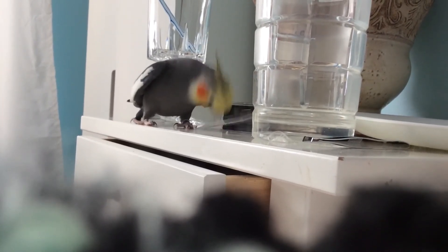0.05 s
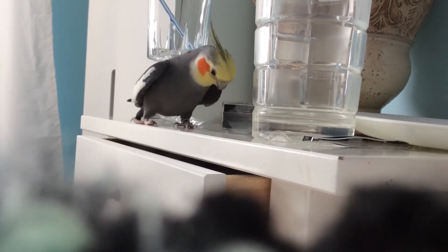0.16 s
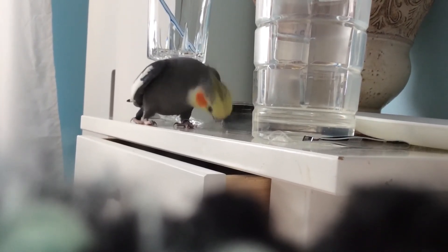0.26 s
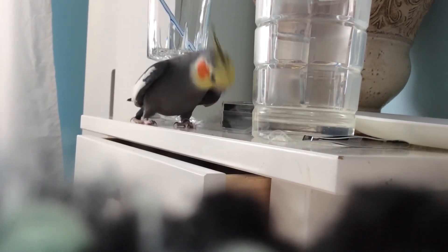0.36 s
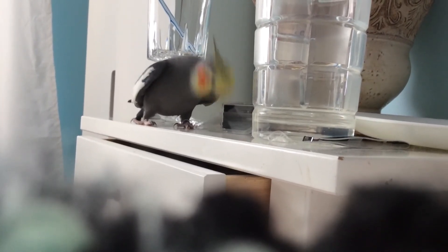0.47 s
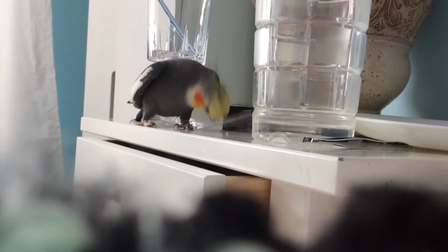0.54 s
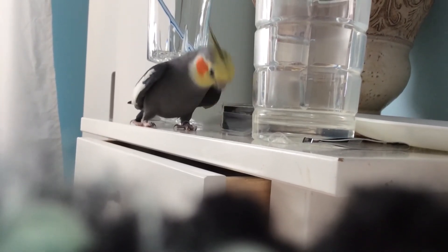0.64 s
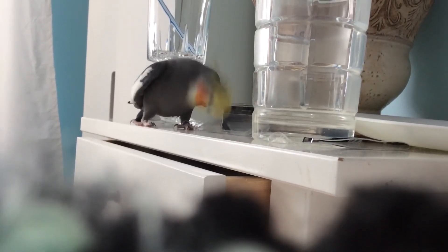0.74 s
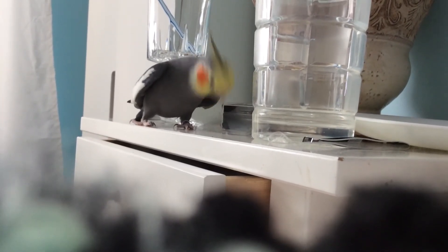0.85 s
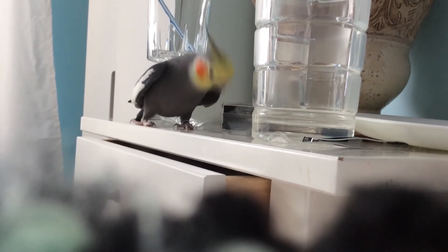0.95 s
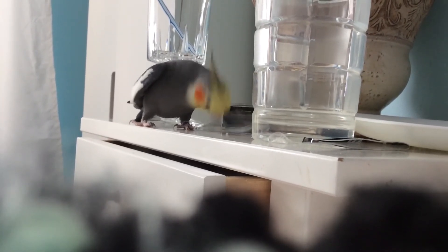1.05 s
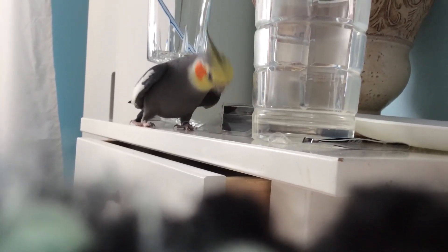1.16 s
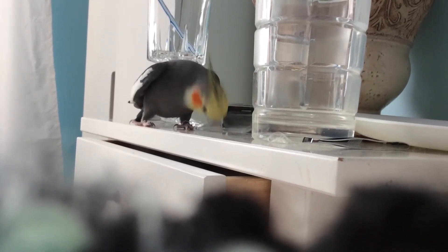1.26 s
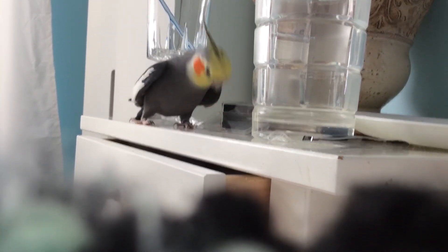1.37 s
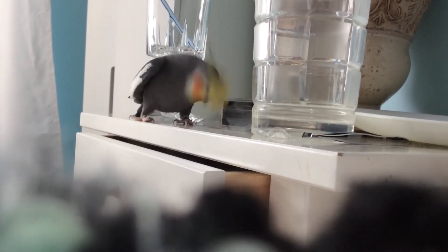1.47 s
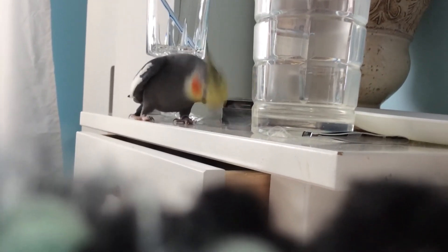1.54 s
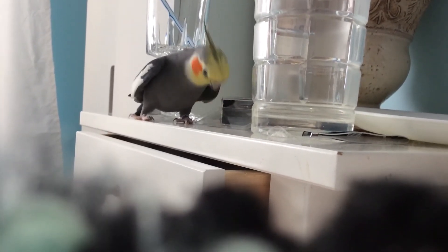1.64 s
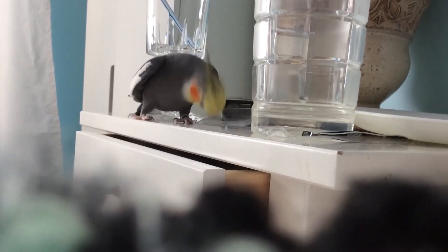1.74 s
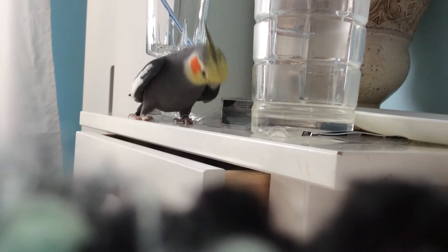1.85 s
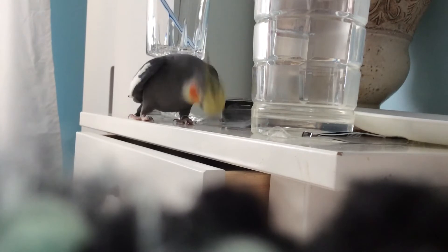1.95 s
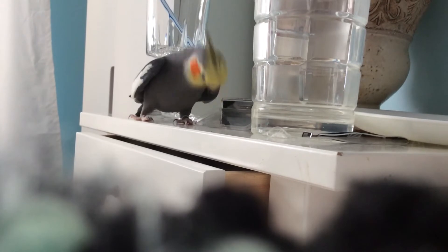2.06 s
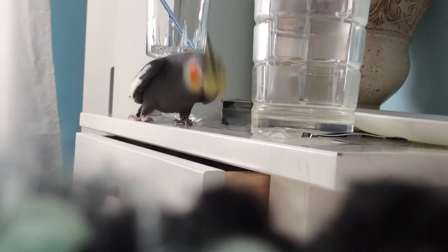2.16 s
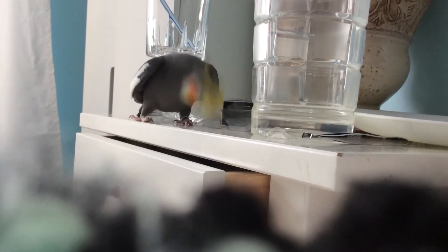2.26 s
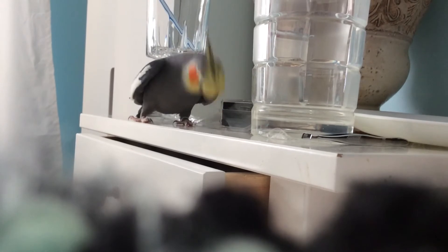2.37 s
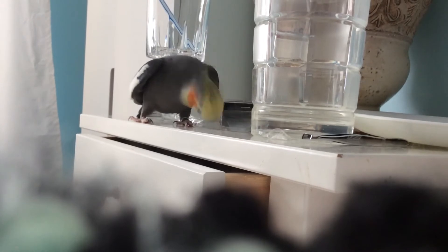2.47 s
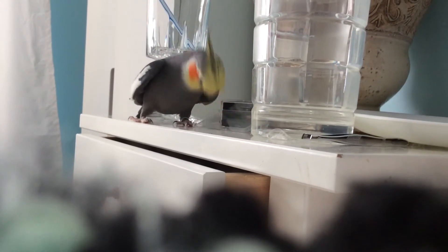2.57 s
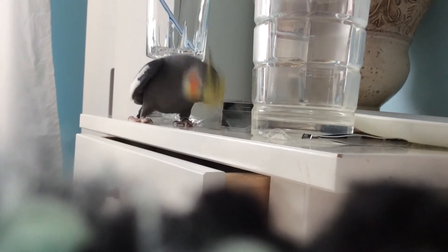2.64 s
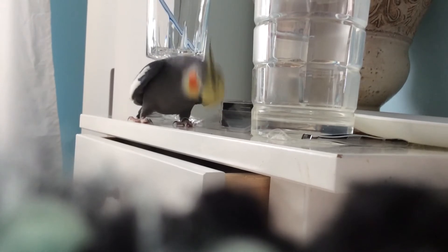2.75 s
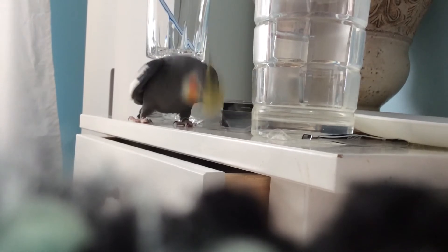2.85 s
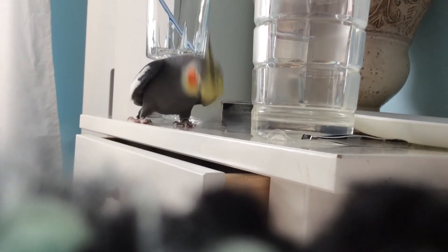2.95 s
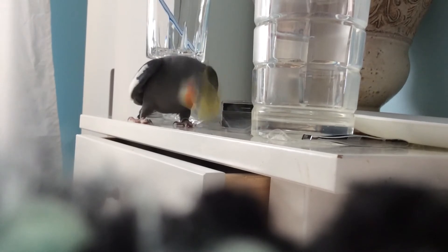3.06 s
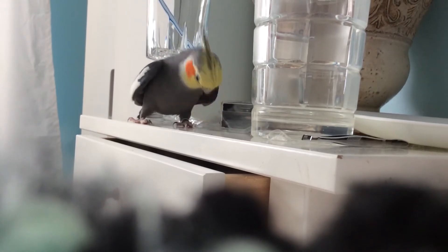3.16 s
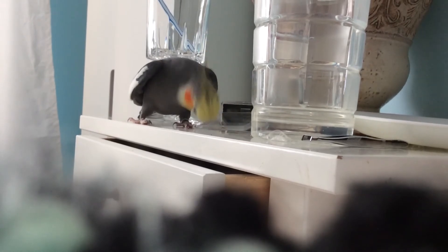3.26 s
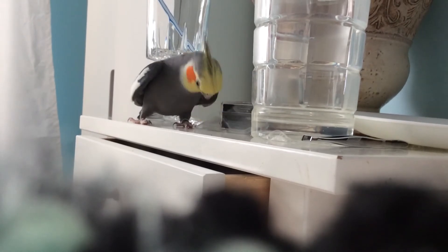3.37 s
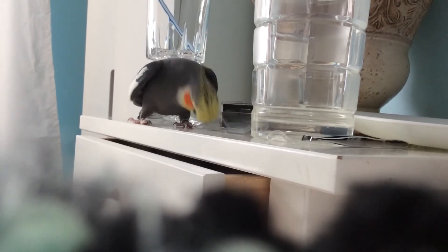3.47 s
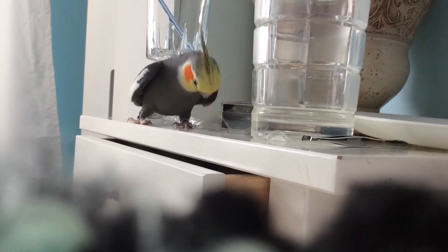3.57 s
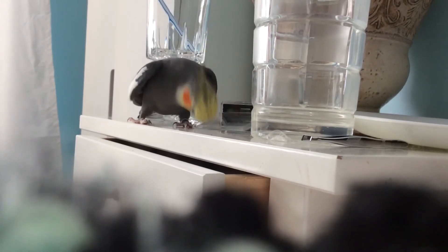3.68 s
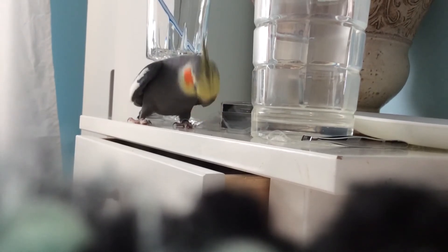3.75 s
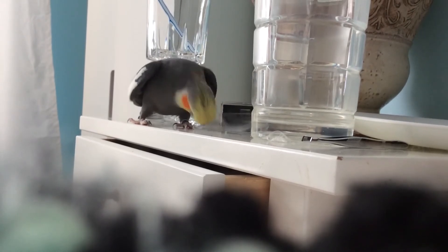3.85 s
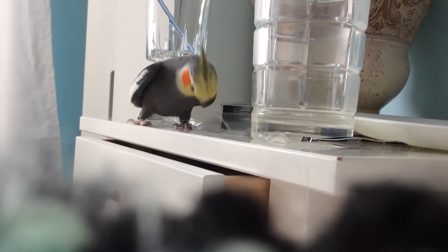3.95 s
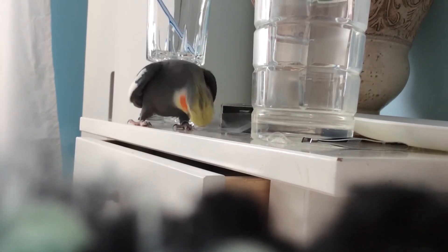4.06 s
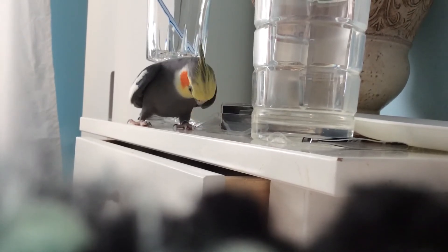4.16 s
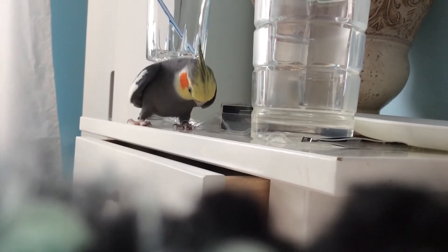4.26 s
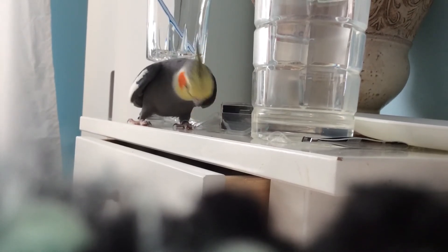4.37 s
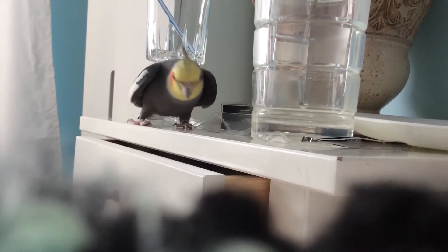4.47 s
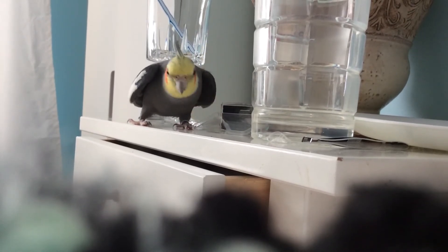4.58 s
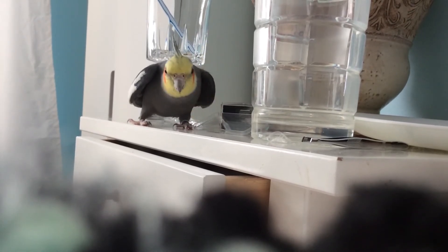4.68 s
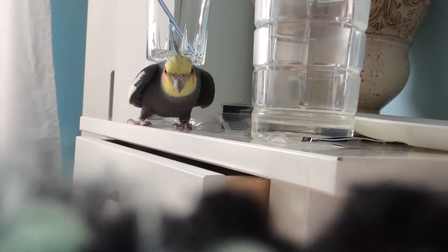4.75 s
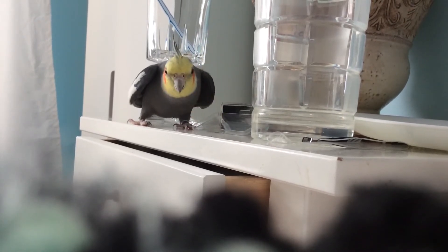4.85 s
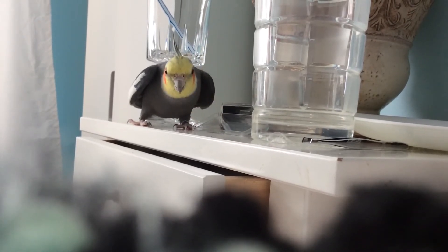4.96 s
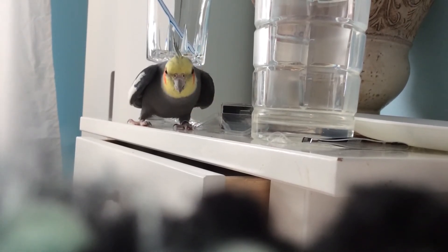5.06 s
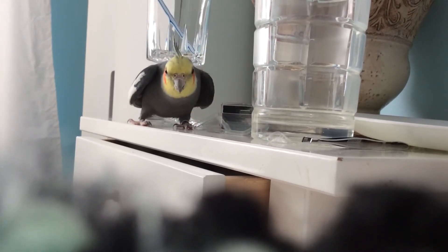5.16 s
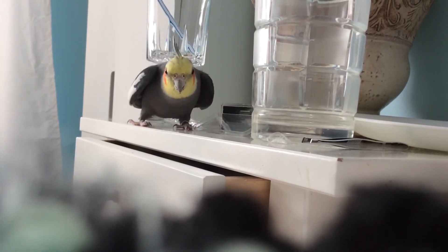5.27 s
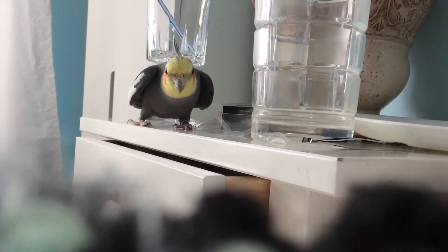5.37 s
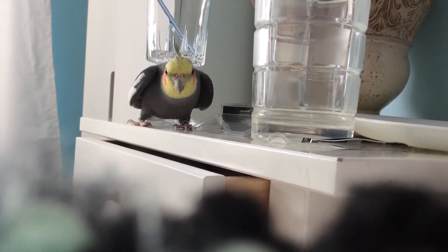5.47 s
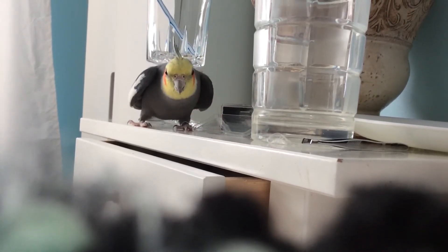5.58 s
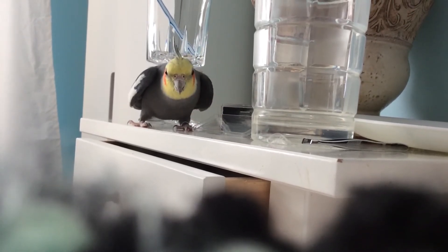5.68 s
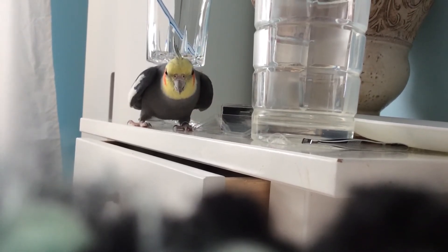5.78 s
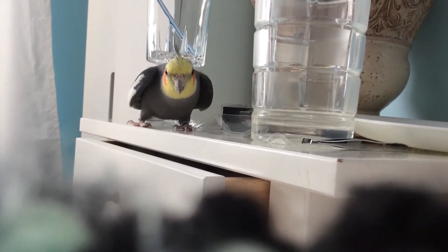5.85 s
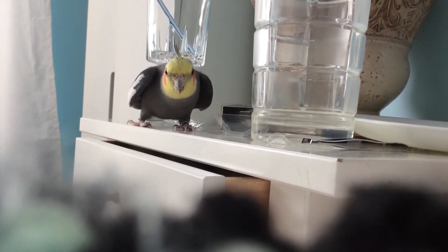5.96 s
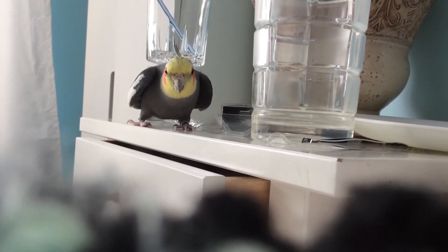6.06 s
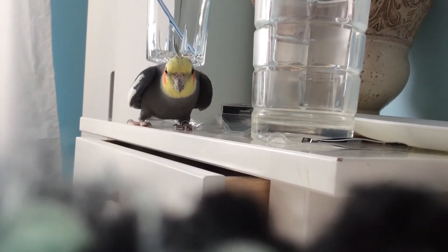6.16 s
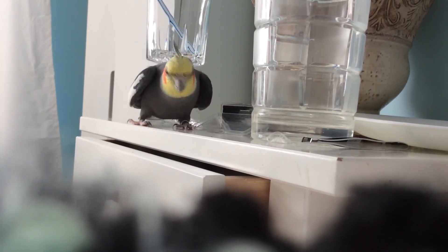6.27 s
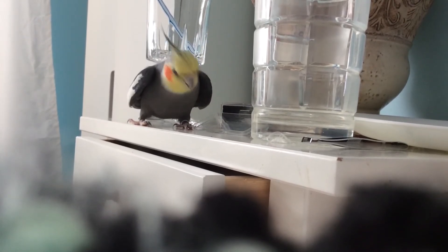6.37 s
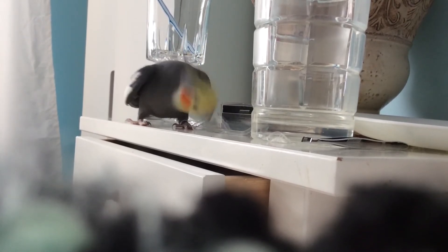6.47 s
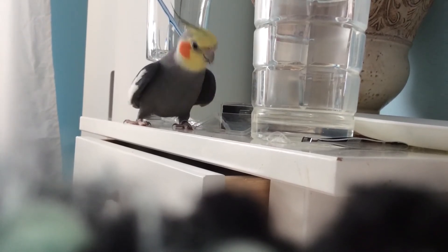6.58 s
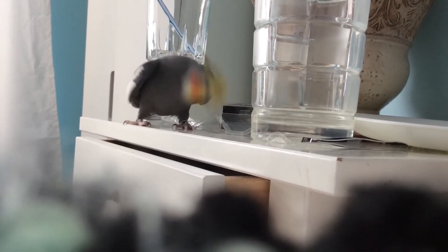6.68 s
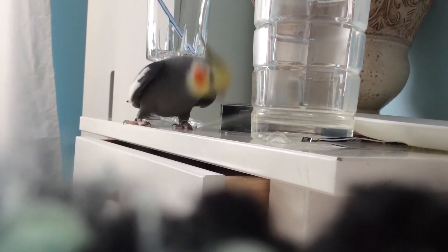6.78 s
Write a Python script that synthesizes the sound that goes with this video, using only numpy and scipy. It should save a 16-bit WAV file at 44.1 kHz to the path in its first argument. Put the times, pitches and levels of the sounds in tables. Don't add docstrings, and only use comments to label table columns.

```python
import sys
import numpy as np
from scipy import signal
from scipy.fft import rfft, irfft
from scipy.io import wavfile
from scipy.ndimage import uniform_filter1d

SR = 44100
rng = np.random.default_rng(int(sys.argv[2]) if len(sys.argv) > 2 else 0)


def gain_from_db(level_db):
    decades = np.asarray(level_db, float) / 20
    return 10 ** decades


def transcribe(signal):
    frames = np.atleast_2d(signal).T
    limited = np.clip(frames, -1, 1)
    pcm = np.round(limited * 32767).astype(np.int16)
    wavfile.write(sys.argv[1], SR, pcm)


N = 300762

# (time [s], beak level [dB], delay of the slap on the wood [ms], slap level [dB], wood knock level [dB])
RAPS = [(0.0925, -6.5, 2.26, -13.5, -47), (0.3356, -6.5, 4.6, -25.5, -45.5), (0.5793, -4, 4.4, -15.5, -42),
        (0.8204, -7.5, 4.3, -12, -49.5), (1.0736, -12, 5.6, -23.5, -57), (1.3151, -11, 2.96, -21, -43.5),
        (1.564, -13, 2.25, -12.5, -45), (1.7817, -8, 3.2, -16, -51.5), (1.9824, -11, 3.78, -9, -49),
        (2.1688, -13.5, 3.7, -10, -42.5), (2.3551, -6, 2.23, -7, -42.5), (2.5463, -6.5, 3.84, -7, -41.5),
        (2.7348, -14, 2.77, -6.5, -39), (2.928, -4.5, 3.1, -16, -39), (3.1184, -8, 3.3, -3.5, -43),
        (3.3168, -5.5, 2.04, -7, -41), (3.5233, -6, 1.3, -20, -41.5), (3.717, -4, 1.9, -28, -41.5),
        (3.9003, -12, 5, -6, -46.5), (4.0942, -4, 2.9, -8, -46), (6.7725, -10, 1.9, -19.5, -66)]
# (time [s], place [0 centre - 1 rim])
BEAK_PLACE = [(0.09, 0.28), (0.82, 0.36), (1.3, 0.11), (2.1, 0.25), (2.45, 0.58), (2.75, 0.44), (3.3, 0.43),
              (4.0, 0.93), (6.77, 0.93)]
# (frequency [Hz], bandwidth [Hz], level [dB])
HELD_LID = [(2760, 160, -3), (3080, 140, -6), (4430, 170, -2), (5020, 140, -1), (6050, 400, -5),
            (6640, 160, -7), (7410, 140, -3), (8290, 140, -12), (9720, 160, -14), (10800, 200, -18)]
# (frequency [Hz], level [dB], T60 [s])
WOOD = [(353.4, 0.5, 0.15)]
# (frequency [Hz], level [dB], T60 [s])
UPPER_WOOD = [(498.4, 4, 0.068), (542, 7.5, .05), (690, -4, 0.034), (884, 0, 0.047)]


def raps():
    out, hz = np.zeros(N), bins(8192)
    held = [(f, db, 3.1 / width) for f, width, db in HELD_LID]
    push = 1 - np.exp(-np.arange(8192) / SR / 0.0033)
    for s, beak_db, gap_ms, slap_db, knock_db in RAPS:
        place = np.interp(s, *np.transpose(BEAK_PLACE))
        softer_db = -10 * np.log10(gain_from_db(beak_db) ** 2 + gain_from_db(slap_db) ** 2)

        click = gain_from_db(6.5) * burst(8192, 0, 0.092, 0.1)
        chatter = gain_from_db(-7) * burst(8192, 0, 4.64, 1.3)
        beak = gain_from_db(beak_db) * (click + chatter)
        slap = gain_from_db(slap_db - 1) * burst(8192, gap_ms, 1.8, 2.3)

        rim_db = tilt(hz, -8.5 + 7.5 * place + 3)
        low_db = (-2.5 + 0.58 * softer_db) * hump(hz, 1770, 0.34)
        mid_db = (-5 + 1.07 * softer_db) * hump(hz, 4400, 0.18)
        add(out, s, gain_from_db(4) * lid(beak + slap, held, rim_db + low_db + mid_db, -13))

        lowest = gain_from_db(3.5) * ring(WOOD, 8192, 0, 0.019)
        upper = gain_from_db(-10 + 20 * place) * ring(UPPER_WOOD, 8192, 2.5, 0.02)
        add(out, s + gap_ms / 1000, gain_from_db(knock_db) * push * (lowest + upper))
    return out


# (frequency [Hz], level [dB])
CRACK = [(290, -30), (500, -19.5), (1730, -11), (2850, 4.5), (3710, -5.5), (4420, -2), (6010, 1),
         (6860, -5.5), (7380, -2.5), (8670, -10), (9600, -5.5), (15600, -29.5), (16500, -41.5)]
# (frequency [Hz], level [dB])
CRACK_EDGES = [(200, -26.5), (400, 0), (12700, -0.5), (13400, -4.5), (15900, -5), (16600, -14)]


def lid(force, modes, colour_db, mode_db):
    hz, force = bins(len(force)), even(force)
    crack = shape(force, curve(CRACK, hz) + curve(CRACK_EDGES, hz) + colour_db)
    response = ring(modes, len(force), 5, 0.012)
    response = response / np.sqrt(np.sum(response ** 2))
    rings = irfft(rfft(force) * rfft(response) * gain_from_db(colour_db), len(force))
    return crack + gain_from_db(mode_db) * rings


# (time [s], peak level [dB], free ring level [dB], rocking level [dB])
LANDINGS = [(0.1822, -16.5, -16.5, -24.5), (0.187, -17.5, -25, -19), (0.4217, -16.5, -19.5, -21.5),
            (0.4282, -20, -38, -29), (0.6814, -15.5, -16.5, -28), (0.9063, -18, -40, -41),
            (0.9097, -18, -19.5, -27), (1.1373, -24.5, -25, -20), (1.1668, -25, -30, -14),
            (1.3695, -26, -27, -15), (1.6162, -26.5, -24, -20), (1.8403, -25, -19.5, -20),
            (2.0374, -26.5, -19, -18), (2.2333, -22.5, -16.5, -25), (2.422, -20, -23.5, -19.5),
            (2.6097, -18.5, -32, -30), (2.8038, -19, -17, -23), (3.0125, -18.5, -18, -27.5),
            (3.1932, -24.5, -34.5, -19), (3.1991, -15, -23.5, -43.5), (3.3712, -25, -21.5, -24),
            (3.5788, -32.5, -18, -18), (3.7727, -25, -21, -16.5), (3.9406, -29.5, -26.5, -17),
            (4.133, -20.5, -27.5, -15.5), (4.152, -26.5, -10, -19)]
# (time [s], peak level [dB], free ring level [dB])
BOUNCES = [(0.232, -33, -27), (0.2587, -46.5, -27), (0.4722, -31, -16), (0.512, -49, -21.5),
           (0.737, -26, -21.5), (0.946, -29, -18), (0.9907, -39, -14), (1.0183, -42, -34),
           (1.187, -72, -19), (1.41, -55, -26), (1.6498, -38.5, -19), (1.6826, -63, -27), (1.868, -31, -28),
           (1.8894, -59.5, -21.5), (2.0609, -26.5, -18), (2.082, -51, -15), (2.251, -26.5, -32),
           (2.2643, -33.5, -16), (2.6386, -29, -22), (2.842, -35, -22), (3.0618, -24.5, -40),
           (3.24, -38, -14), (3.401, -37, -10.5), (3.42, -39, -20), (3.4644, -49, -31), (3.809, -34.5, -35),
           (3.9588, -30.5, -28), (3.991, -28.5, -25), (4.1856, -32, -16)]
# (frequency [Hz], level [dB], T60 [s])
FREE_LID = [(2400, -8, .04), (2660, 0, .05), (3010, -10, .035), (3230, -7, .035), (3990, -12, .03),
            (4690, -6, .04), (5440, -12, .03), (5900, -12, .035), (6170, -6, .04), (6800, -13, .03),
            (7370, -9, .035), (8110, -15, .025), (9700, -13, .025)]
# (frequency [Hz], level [dB], T60 [s])
LOW_RING = [(1523, 0, .17), (1668, -5, .11), (950, -11, .04)]


def landings():
    clatter, rings, t = np.zeros(N), np.zeros(N), np.arange(8192) / SR
    bounce_rock_db, skid_ms = -21.5, 3.5
    falls = sorted(LANDINGS + [(*row, bounce_rock_db) for row in BOUNCES])
    touches = np.sort([row[0] for row in falls + RAPS])
    for s, peak_db, ring_db, rock_db in falls:
        free_s = min(touches[touches > s + 0.012][0] - s, 0.045)
        stilled = np.exp(-np.maximum(t - free_s, 0) / 0.0038)

        skid = burst(8192, 0, skid_ms, 3.11, 0.25)
        rocking = gain_from_db(rock_db) * stilled * burst(8192, 0, 70, 3.2)
        bright_db = max(8 + 0.43 * peak_db, -8)
        touch = lid(skid + rocking, FREE_LID, tilt(bins(8192), bright_db), -7)
        add(clatter, s - 0.0008, peak(touch, peak_db + 0.5))

        low = ring(LOW_RING, 8192, 4, 0.004)
        onset = 1 - np.exp(-t / 0.0011)
        add(rings, s, gain_from_db(peak_db + ring_db - 1.5) * onset * stilled * low)
    return clatter, rings


# (frequency [Hz], level [dB], T60 [s])
THUD = [(750, -2.5, 0.035), (900, 0.5, 0.072), (370, -2.5, 0.097)]


def thuds():
    out, push = np.zeros(N), 1 - np.exp(-np.arange(4096) / SR / 0.002)
    for s, peak_db, *_ in LANDINGS:
        level_db = -26 - 21.5 + 1.04 * (peak_db + 20)
        add(out, s, gain_from_db(level_db) * push * ring(THUD, 4096, 3, 0.03))
    return out


# (time [s], length [s], level [dB])
RUSTLES = [
    (0, 0.086, -50.5),
    (4.322, 0.14, -57),
    (5.751, 0.071, -66),
    (5.981, 0.045, -65.5),
    (6, 0.19, -68),
    (6.12, 0.14, -66),
]


def rustles():
    out = np.zeros(N)
    for s, length, db in RUSTLES:
        u = np.linspace(0, 1, int(length * SR))
        grain = rng.standard_normal(len(u)) * gain_from_db(1.6 * rng.exponential(size=len(u)))
        add(out, s, gain_from_db(db) * grain * np.minimum(u / 0.045, 1) * (1 - u) ** 0.93)
    return signal.sosfilt(signal.butter(2, (1500, 8000), "bandpass", fs=SR, output="sos"), out)


def peep():
    out = np.zeros(N)
    s, length, hz, db = 6.345, 0.06, 2670, -66
    t = np.arange(int(3 * length * SR)) / SR
    swell = 6 * t / length * np.exp(-3.5 * t / length)
    waver = 0.4 * np.sin(2 * np.pi * 45 * t)
    add(out, s, gain_from_db(db) * swell * np.sin(2 * np.pi * hz * t + waver))
    return out


def echoes(near):
    out, edges = np.zeros(N), [int((row[0] - 0.002) * SR) for row in RAPS] + [N]
    for a, b in zip(edges, edges[1:]):
        tail = signal.fftconvolve(near[a:min(b, a + 2 ** 14)], room())[:N - a]
        out[a:a + len(tail)] += tail
    return out


# (frequency [Hz], level [dB])
ROOM = [(530, -37), (900, -16), (1290, -30.5), (1470, -17.5), (1620, -20), (2500, -7.5), (3770, -15.5),
        (4860, -16), (5280, -17), (9530, -20), (12000, -29.5), (13400, -34), (16000, -51.5)]
# (frequency [Hz], T60 [s])
ROOM_T60 = [(1000, 0.24), (2600, 0.31), (4000, 0.36), (8000, 0.26), (15000, 0.31)]


def room():
    t = np.arange(2 ** 14) / SR
    hz, noise, tail = bins(len(t)), rfft(rng.standard_normal(len(t))), 0
    for centre in 700 * 2 ** np.arange(0, 4.6, 0.5):
        band = irfft(noise * np.clip(1 - np.abs(2 * np.log2((hz + 1) / centre)), 0, 1))
        tail = tail + band * 1000. ** (-t / curve(ROOM_T60, centre))
    return shape(tail * np.clip(t / 0.003, 0, 1), curve(ROOM, hz) - curve(CRACK, hz))


# (frequency [Hz], level [dB rms])
HUM = [(68.9, -54), (77.5, -60), (119.95, -51.5), (359.9, -67), (589.95, -69.5), (696.9, -99)]
# (frequency [Hz], level [dB per Hz])
AIR = [(15, -47.5), (35, -13.5), (45, -16), (58, -13.5), (66, -3.5), (115, 2), (150, -4.5), (190, -13.5),
       (340, -13.5), (700, -22), (1500, -34), (4000, -42.5), (7000, -45.5), (9000, -42), (13000, -52.5),
       (16000, -60)]


def hum():
    t = np.arange(N) / SR
    lines = 0
    for hz, db in HUM:
        sway_db = 1.2 * np.interp(t, np.linspace(0, t[-1], 30), rng.standard_normal(30))
        tone = np.sin(2 * np.pi * (hz * t + rng.random()))
        lines = lines + np.sqrt(2) * gain_from_db(db + sway_db) * tone
    air = irfft(rfft(rng.standard_normal(N)) * gain_from_db(curve(AIR, bins(N))), N)
    return lines + air / air.std() * gain_from_db(-52)


def ring(modes, size, scatter_db, detune):
    t = np.arange(size) / SR
    luck = rng.standard_normal((len(modes), 2))
    out = 0
    for (hz, db, t60), (a, b) in zip(modes, luck):
        tone = np.sin(2 * np.pi * hz * (1 + detune * b) * t)
        out = out + gain_from_db(db + scatter_db * a) * tone * 1000. ** (-t / t60)
    return out


def burst(size, start_ms, fade_ms, grain_db, rise_ms=0.092):
    ms = np.maximum(np.arange(size) / SR * 1000 - start_ms, 0)
    grains = np.minimum(rng.exponential(size=size), 4.5)
    chatter = rng.standard_normal(size) * gain_from_db(grain_db * grains)
    return chatter / chatter.std() * np.exp(-ms / max(fade_ms, 0.1)) * (1 - np.exp(-ms / rise_ms))


def even(force):
    power = np.abs(rfft(force)) ** 2
    broad = uniform_filter1d(power, size=len(force) // 64)
    return shape(force, 8 * np.log10(power.mean() / broad))


def shape(x, gain_db):
    cep = irfft(gain_db * np.log(10) / 20, len(x))
    cep[1:len(x) // 2] *= 2
    cep[len(x) // 2 + 1:] = 0
    return irfft(rfft(x) * np.exp(rfft(cep)), len(x))


def tilt(hz, bright_db):
    return bright_db * np.tanh(2 * np.log2((hz + 1) / 4500)) / 2


def hump(hz, centre_hz, octaves):
    return np.exp(-(np.log2((hz + 1) / centre_hz) / octaves) ** 2)


def curve(table, hz):
    f, v = np.transpose(table)
    return np.interp(np.log(hz + 1), np.log(f), v)


def bins(size):
    return np.arange(size // 2 + 1) * SR / size


def peak(x, db):
    return x * gain_from_db(db) / np.abs(x).max()


def add(track, s, x):
    i = int(s * SR)
    track[i:i + len(x)] += (x * np.minimum(np.linspace(4, 0, len(x)), 1))[:N - i]


def scene():
    clatter, rings = landings()
    near = raps() + clatter
    tail = gain_from_db(-32.5) * echoes(near)
    return (near + rings + tail + rustles() + peep() + hum() + thuds())[None]


def sparse_top(x):
    edge_hz, threshold_db = 13040, -81
    hz, _, cells = signal.stft(x, SR, nperseg=512)
    luck = uniform_filter1d(rng.standard_normal(cells.shape), size=3, axis=1)
    luck = uniform_filter1d(luck, size=9, axis=2)
    strong = uniform_filter1d(np.abs(cells), size=3, axis=1) > gain_from_db(threshold_db + 55 * luck)
    kept = cells * (strong | (hz < edge_hz)[:, None])
    return signal.istft(kept, SR, nperseg=512)[1][:, :N]


# (frequency [Hz], level [dB])
SMEAR = [(1500, -29), (3000, -22), (5000, -19), (5900, -11), (6600, -17.5), (7400, -11.5), (7800, -12),
         (8100, 3.5), (8600, -18), (12000, -29)]


def smear(x):
    noise = irfft(rfft(rng.standard_normal(1024)) * gain_from_db(curve(SMEAR, bins(1024))))
    swell = np.exp(np.linspace(-1024 / SR / 0.0045, 0, 1024))
    ahead = noise / np.sqrt(np.sum(noise ** 2)) * swell
    return x + gain_from_db(-14.5) * signal.fftconvolve(x, ahead[None])[:, 1023:]


def top_cut(x):
    return signal.sosfilt(signal.butter(12, 16990, fs=SR, output="sos"), x)


def record(dry):
    x = signal.sosfilt(signal.butter(2, 40, "highpass", fs=SR, output="sos"), dry)
    x = smear(x)
    x = np.tanh(1.086 * x) / 1.134
    x = signal.sosfilt(signal.ellip(8, 0.2, 60, 16300, fs=SR, output="sos"), x)
    x = sparse_top(x)
    return top_cut(x)


dry = scene()
out = record(dry)
transcribe(out)
```